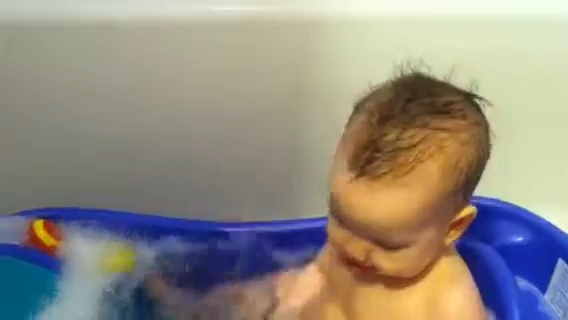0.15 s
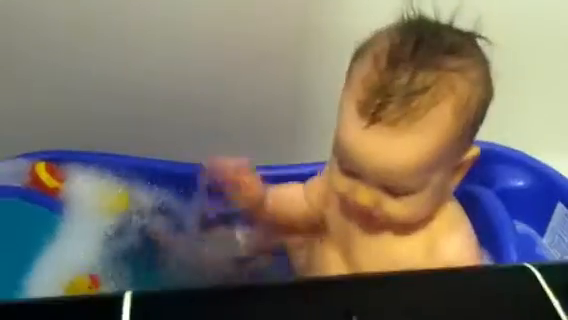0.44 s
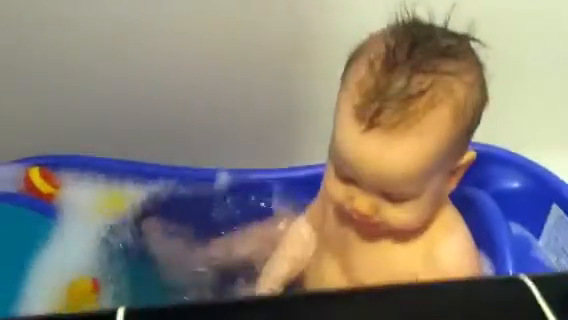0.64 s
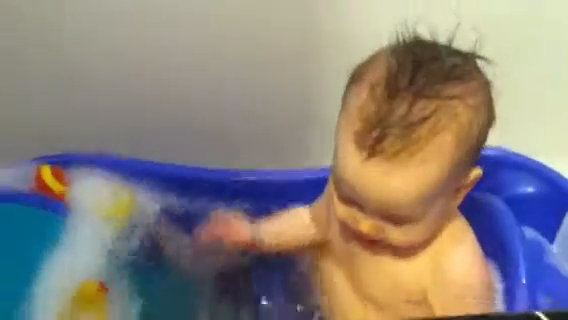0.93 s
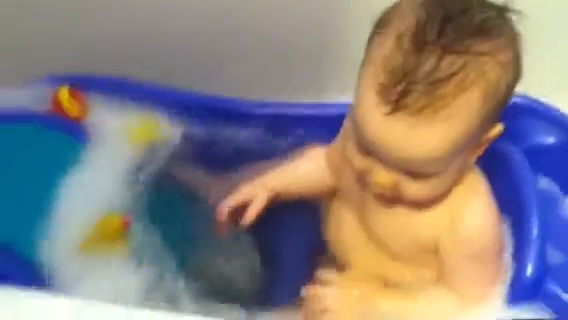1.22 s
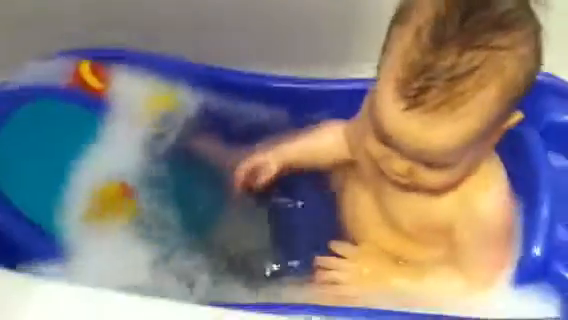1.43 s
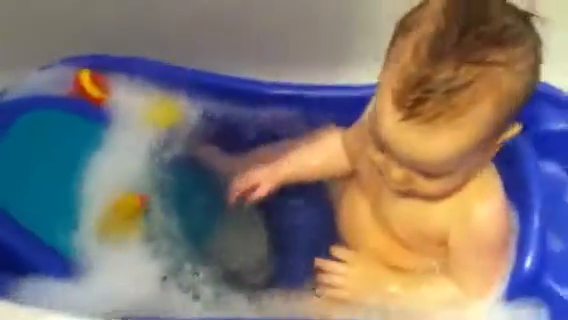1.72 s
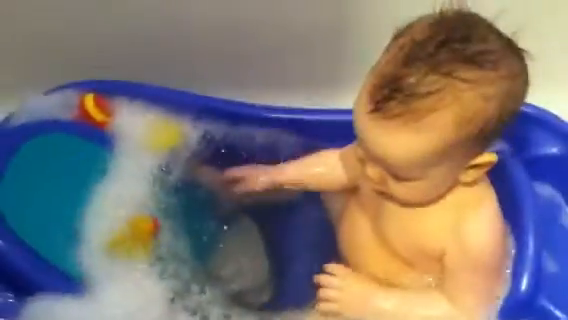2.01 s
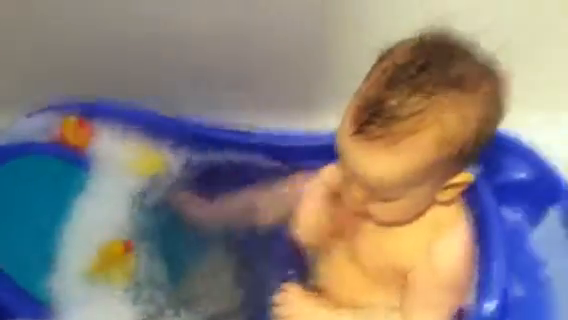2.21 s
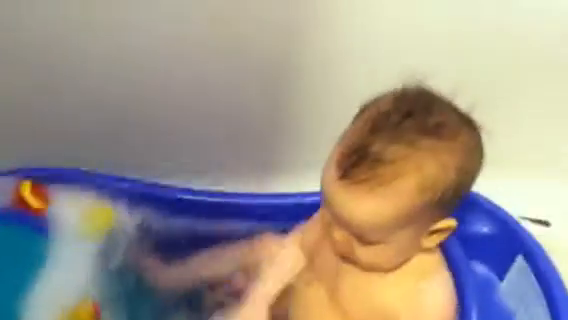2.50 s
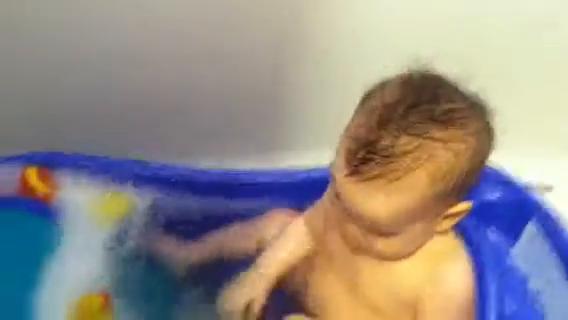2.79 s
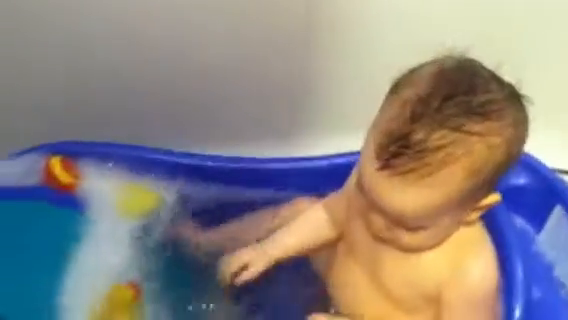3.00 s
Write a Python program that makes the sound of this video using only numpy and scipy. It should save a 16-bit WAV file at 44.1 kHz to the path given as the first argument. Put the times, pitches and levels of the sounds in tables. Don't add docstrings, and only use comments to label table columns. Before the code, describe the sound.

Irregular water splashing with fizzy spray and pitched drips, thinning to near quiet before a final hard slap; lively short bathroom echo, small slightly dull microphone, faint rumble and hiss.

```python
import sys
import numpy as np
from scipy import signal
from scipy.fft import rfft, irfft
from scipy.io import wavfile

SR = 44100
rng = np.random.default_rng(int(sys.argv[2]) if len(sys.argv) > 2 else 0)


def voltage_ratio(decibels):
    exponent = np.asarray(decibels, float) / 20
    return 10 ** exponent


def bounce(signal):
    frames = np.transpose(np.atleast_2d(signal))
    limited = np.clip(frames, -1, 1)
    pcm = np.round(limited * 32767).astype(np.int16)
    wavfile.write(sys.argv[1], SR, pcm)


N = 138915
TIME_S = np.arange(N) / SR


def rms_one(x):
    return x / np.sqrt(np.mean(x ** 2) + 1e-20)


def at_hz(points, hz):
    table_hz, value = np.transpose(points)
    return np.interp(np.log(hz), np.log(table_hz), value)


def colour(x, points):
    hz = np.maximum(np.fft.rfftfreq(len(x), 1 / SR), 1)
    return rms_one(irfft(rfft(x) * voltage_ratio(at_hz(points, hz)), len(x)))


def butter(x, order, hz, kind="low"):
    return signal.sosfilt(signal.butter(order, hz, kind, fs=SR, output="sos"), x)


def add(out, start_s, piece):
    i = int(start_s * SR)
    out[i:i + len(piece)] += piece


def ring(clicks, hz, t60_s):
    radius = voltage_ratio(-60 / (t60_s * SR))
    turn = 2 * np.pi * hz / SR
    return signal.lfilter([.5, 0, -.5], [1, -2 * radius * np.cos(turn), radius * radius], clicks + 1e-18)


def bubbles(points, per_s, cycles, count=70):
    spread_db, clump_db, clump_s = 2.2, 3.0, 0.012
    sizes = voltage_ratio(spread_db * np.minimum(rng.exponential(1, N), 4.5)) * rng.choice([-1, 1], N)
    born = rng.random(N) < per_s / SR
    dealt = rng.integers(0, count, N)
    clumps = rng.standard_normal((count // 5 + 1, 800))
    out = np.zeros(N)
    for k, hz in enumerate(np.geomspace(300, 14000, count)):
        clump = voltage_ratio(clump_db * np.interp(TIME_S / clump_s, np.arange(800), clumps[k // 5]))
        bursts = sizes * clump * born * (dealt == k)
        out += voltage_ratio(at_hz(points, hz)) * np.sqrt(hz) * rms_one(ring(bursts, hz, cycles / hz))
    return rms_one(out)


def plip(hz, cycles):
    rise, swell_share = 0.043, 0.08
    turns = hz * np.arange(int(cycles / hz * SR) + 2) / SR
    tone = np.sin(2 * np.pi * turns * (1 + rise * turns / cycles))
    swell = np.minimum(turns / (swell_share * cycles), 1) ** 2
    return tone * voltage_ratio(-60 * turns / cycles) * swell


def strikes(rows):
    trim_db, tick_db, tick_reach, tick_top_hz = -0.5, -16, 2.5, 9000
    out = np.zeros(N + SR)
    for start_s, peak_db, pitch_hz, ring_cycles in rows:
        tick = rng.standard_normal(60) * np.exp(-np.arange(60) / 17.0)
        tick = butter(tick, 2, min(tick_reach * pitch_hz, tick_top_hz))
        add(out, start_s, voltage_ratio(peak_db + trim_db) * plip(pitch_hz, ring_cycles))
        add(out, start_s, voltage_ratio(peak_db + tick_db) * tick)
    return out[:N]


# freq_hz, level_db_per_hz
FLOOR_COLOUR = [(18, -66), (30, -25), (62, -24), (85, -16.5), (222, -10), (260, -7), (420, -8), (754, -15),
                (1410, -19.5), (15000, -35)]
# start_s, end_s, pitch_hz, level_db
ROOM_HUM = (1.85, 2.12, 250, -65.5)


def background():
    floor_db = -65.5
    start_s, end_s, pitch_hz, level_db = ROOM_HUM
    fade = np.clip(np.minimum(TIME_S - start_s, end_s - TIME_S) * 20, 0, 1)
    hum = voltage_ratio(level_db) * fade * np.sin(2 * np.pi * pitch_hz * TIME_S)
    return voltage_ratio(floor_db) * colour(rng.standard_normal(N), FLOOR_COLOUR) + hum


# time_s, level_db
SLOSH_LEVEL = [(0.0, -45.5), (0.27, -48), (0.41, -49.5), (0.63, -48), (0.76, -39), (0.89, -55),
               (1.17, -50.5), (1.46, -67), (1.54, -67.5), (2.05, -80), (2.24, -69), (2.36, -53),
               (2.5, -56.5), (2.7, -83), (2.82, -49.5), (2.86, -46.5), (3.02, -57), (3.15, -61.5)]
# freq_hz, level_db_per_hz
SLOSH_COLOUR = [(300, -32), (700, -4), (1300, 2), (2200, 6.5), (3700, -1), (5500, -3), (9500, -9),
                (14000, -29)]


def slosh():
    time_s, level_db = np.transpose(SLOSH_LEVEL)
    fizz = bubbles(SLOSH_COLOUR, per_s=4500, cycles=30, count=80)
    return voltage_ratio(np.interp(TIME_S, time_s, level_db) - 4) * fizz


# start_s, length_s, level_db, pitch_hz,
# pitch_rise_share
AIR_POCKETS = [(0.02, 0.03, -54.5, 1280, 0.05), (0.033, 0.02, -56, 1050, 0.03),
               (0.058, 0.025, -44.5, 1636, 0.042), (0.26, 0.16, -58.5, 765, .02),
               (0.202, 0.082, -45.5, 1570, 0.044), (0.263, 0.036, -31.5, 1910, 0.05),
               (0.268, 0.04, -35, 2380, 0.026), (0.327, 0.041, -40.5, 1560, 0.061),
               (0.337, 0.055, -49, 1260, 0.03), (0.331, 0.045, -47.5, 2100, 0.05),
               (0.513, 0.024, -54, 1006, 0.12), (0.583, 0.044, -39, 1700, 0.039),
               (0.62, 0.11, -51.5, 868, 0.053), (0.676, 0.13, -48.5, 1304, 0.23),
               (0.721, 0.17, -47, 2700, 0.1), (0.787, 0.027, -49.5, 900, 0.089),
               (0.862, 0.1, -49, 1550, 0.14), (0.928, 0.04, -60.5, 750, 0.059),
               (0.951, 0.032, -51.5, 3060, 0.039), (0.974, 0.032, -58, 1220, 0.072),
               (1.146, 0.075, -43.5, 1870, 0.042), (1.168, 0.023, -45, 1400, 0.068),
               (1.22, 0.03, -45.5, 967, 0.32), (1.299, 0.038, -47, 1700, 0.047),
               (2.249, 0.074, -53.5, 2650, .05), (2.289, 0.021, -47.5, 1950, .05),
               (2.27, .04, -54, 3750, .03), (2.348, 0.026, -49, 1770, 0.087),
               (2.39, 0.031, -46.5, 1810, 0.098), (2.506, 0.043, -62, 1930, .03),
               (2.67, 0.048, -40, 994, 0.1), (2.684, 0.034, -37.5, 1330, 0.043),
               (2.753, 0.035, -41, 1940, 0.062), (2.765, 0.037, -42, 2600, 0.03),
               (2.793, 0.043, -52, 2000, 0.024), (2.852, 0.044, -48, 1510, 0.065),
               (2.854, 0.025, -44, 3070, 0.1), (2.971, 0.015, -47.5, 2100, 0.046),
               (2.96, 0.026, -61, 596, 0.069), (2.993, 0.029, -61, 644, 0.11),
               (3.032, 0.032, -65, 710, 0.042), (3.057, 0.013, -53.5, 1850, 0.03)]


def pockets():
    per_s, cycles, scatter = 350, 19.1, 0.06
    out = np.zeros(N + SR)
    for start_s, length_s, level_db, pitch_hz, rise in AIR_POCKETS:
        gap, pitch, size = rng.random((3, 50))
        late_s = np.cumsum(-np.log(1 - gap)) / per_s
        for wait, p, z in zip(late_s[late_s < length_s] / length_s, pitch, size):
            hz = pitch_hz * (1 + rise * wait + scatter * (2 * p - 1))
            db = level_db + 13.5 - 4.46 * z - 4.1 * wait
            add(out, start_s + wait * length_s, voltage_ratio(db) * plip(hz, cycles))
    return out[:N]


# start_s, peak_db, pitch_hz, ring_cycles
CLAPS_AND_DRIPS = [(.274, -17, 2200, 7), (.7155, -19, 2600, 7), (1.216, -36, 600, 10), (2.652, -24, 6050, 30),
                   (2.6615, -22, 2300, 8), (2.6644, -3, 1300, 4.5), (2.6646, -7, 5300, 12),
                   (2.6652, -14, 2300, 8), (2.667, -27, 560, 10), (2.668, -17, 980, 12), (2.69, -22, 1050, 14),
                   (2.706, -25, 900, 12), (2.6715, -16, 1350, 8), (2.679, -17, 1400, 7), (2.682, -25, 680, 8),
                   (1.3279, -20, 4700, 24), (.832, -19, 5700, 25), (2.351, -34, 2300, 8), (.128, -25, 2800, 9)]


def claps_and_drips():
    return strikes(CLAPS_AND_DRIPS)


# start_s,
# peak_db, pitch_hz, ring_cycles
FALLING_DROPS = [(0.149, -24, 720, 20.6), (0.151, -36.5, 757.6, 170), (0.248, -25, 1890, 34),
                 (0.579, -29, 1930, 23), (0.606, -19, 2570, 18.4), (0.616, -32, 929, 69),
                 (0.676, -27.5, 1440, 33), (1.092, -31, 2480, 45), (1.111, -26, 1327, 48),
                 (1.133, -14, 2070, 18), (1.211, -21.5, 1640, 33), (1.301, -32, 1810, 34),
                 (1.5, -31, 2750, 23), (2.048, -53, 1850, 40), (2.183, -35.5, 2370, 16),
                 (2.246, -49, 2400, 25), (2.4, -26.5, 2000, 32), (2.853, -27, 3080, 37),
                 (2.977, -38, 2540, 16), (3.058, -30.5, 1990, 4.8),
                 (0.1511, -21, 5080, 18), (0.232, -26.5, 5460, 46), (0.383, -20.5, 5770, 17),
               (0.4058, -19, 5040, 27), (0.616, -23, 4470, 34), (0.6534, -26, 3640, 36),
               (0.834, -25, 5560, 81), (1.0127, -24.5, 5450, 42), (1.42, -49, 9500, 12),
               (1.8475, -46.5, 5900, 15), (2.2134, -37.5, 7400, 20), (2.215, -42, 5900, 25),
               (2.263, -41, 5400, 30), (2.2996, -29.5, 6010, 46), (2.3647, -33.5, 5460, 44),
               (2.391, -36, 6460, 57), (2.4019, -29, 5730, 45), (2.4828, -42, 3380, 69),
               (2.789, -18, 5670, 23), (2.8527, -27.5, 5240, 23), (2.858, -33, 3670, 110),
               (2.9183, -38.5, 5000, 50), (2.975, -33, 3980, 94), (3.0587, -35, 5510, 55)]


def drops():
    return strikes(FALLING_DROPS)


# peak_s, spray_db, rise_s, fall_t60_s, lowest_bubble_hz
SLAP_HITS = [(0.231, -42, 0.023, 0.13, 1500), (0.274, -26.5, 0.011, 0.18, 1330),
             (0.393, -42, 0.021, 0.26, 2920), (0.572, -46.5, 0.0021, 0.6, 5600),
             (0.679, -33, 0.0049, 0.12, 1140), (0.714, -26.5, 0.0087, 0.17, 1700),
             (0.735, -40, 0.028, 0.21, 2020), (0.834, -43, 0.0049, 0.21, 2300),
             (1.115, -38, 0.011, 0.12, 1150), (1.14, -44, 0.015, 0.18, 1500),
             (1.218, -34, 0.027, 0.16, 690), (2.295, -61.5, 0.13, 0.053, 1390),
             (2.406, -43.5, 0.011, 0.051, 1570), (2.666, -20.5, 0.0062, 0.053, 514),
             (2.684, -29, 0.0086, 0.16, 4330), (2.791, -41, 0.051, 0.22, 3630)]
# freq_hz, level_db_per_hz
SPRAY_COLOUR = [(300, -45), (700, -26), (1300, -20.5), (2200, 5), (3700, -5.5), (5500, 1), (9500, -6.5),
                (14000, -47)]


def slaps():
    out = np.zeros(N)
    spray = bubbles(SPRAY_COLOUR, per_s=13000, cycles=11.0)
    for peak_s, spray_db, rise_s, fall_t60_s, low_hz in SLAP_HITS:
        before, after = (peak_s - TIME_S) / (4 * rise_s), (TIME_S - peak_s) / fall_t60_s
        swell = voltage_ratio(spray_db - 60 * np.where(TIME_S < peak_s, before, after))
        out += butter(swell * spray, 3, low_hz, "high")
    return out


# start_s, level_db
WALL_PUSHES = [(0.268, -49), (0.714, -53.5), (1.217, -55.5), (1.509, -60.5), (2.278, -68.5), (2.49, -69),
               (2.665, -52), (2.971, -60)]


def tub_wall():
    push_t60_s, mode_t60_s = 0.11, 0.039
    push = np.zeros(N)
    for start_s, level_db in WALL_PUSHES:
        push += voltage_ratio(level_db - 60 * np.abs(TIME_S - start_s) / push_t60_s) * (TIME_S > start_s)
    modes_hz = [179, 251, 255.5, 380, 528]
    return sum(ring(push * rng.standard_normal(N), hz, mode_t60_s) for hz in modes_hz) / 10


# freq_hz, t60_s
ROOM_DECAY = [(200, 0.76), (700, 0.47), (2000, 0.31), (5000, 0.28), (12000, 0.23)]


def bathroom(x):
    room_db, early_share, first_echo_s = -1, 0.06, 0.00191
    tub_echo_db, tub_echo_t60_s = 11, 0.02
    t = np.arange(SR) / SR
    share = np.minimum(early_share + 30 * t ** 2, 1)
    dense = rng.standard_normal(SR) * (rng.random(SR) < share) / np.sqrt(share)
    tail = np.zeros(SR)
    for low_hz in 100 * 2 ** np.arange(0, 8.):
        band = butter(dense, 2, [low_hz, min(2 * low_hz, 20000)], "band")
        tail += band * voltage_ratio(-60 * t / at_hz(ROOM_DECAY, 2.4 * low_hz))
    tail *= (t > first_echo_s) * (1 + voltage_ratio(tub_echo_db - 60 * t / tub_echo_t60_s))
    return voltage_ratio(room_db) * signal.fftconvolve(x, tail / np.sqrt(np.sum(tail ** 2)))[:N]


def scene():
    water = slosh() + pockets() + claps_and_drips() + drops() + slaps() + tub_wall()
    water = butter(water, 4, 210, "high")
    return (water + bathroom(water) + background())[None]


def band_limit(x):
    return signal.sosfilt(signal.butter(12, 15700, fs=SR, output="sos"), x)


def record(dry):
    mix = butter(dry, 4, 13300)
    return band_limit(mix)


dry = scene()
out = record(dry)
bounce(out)
```